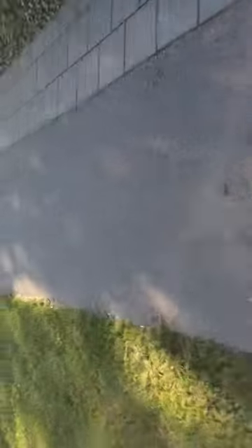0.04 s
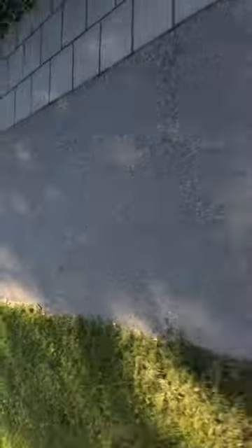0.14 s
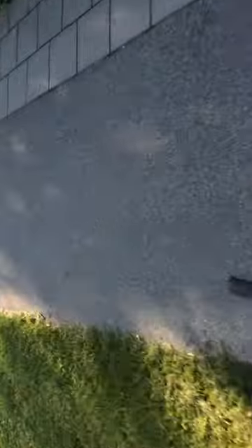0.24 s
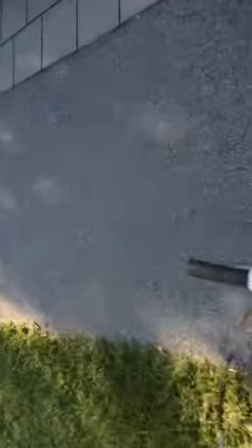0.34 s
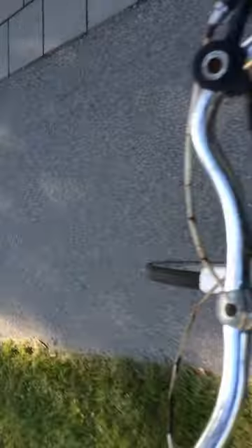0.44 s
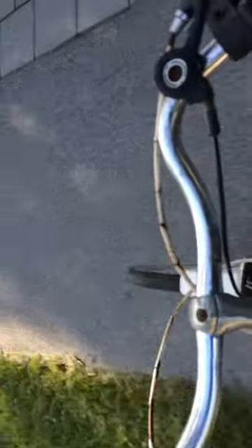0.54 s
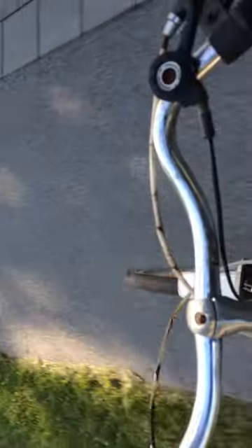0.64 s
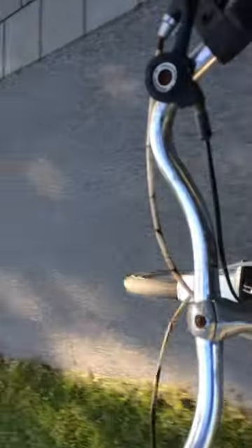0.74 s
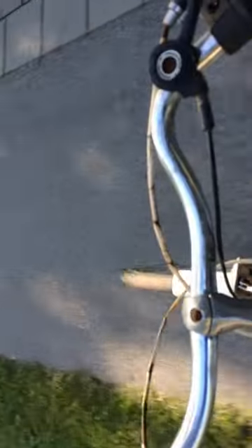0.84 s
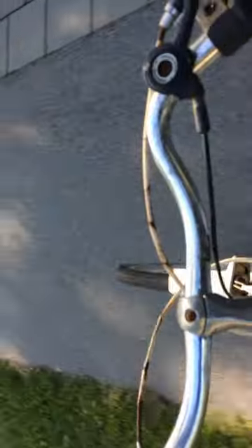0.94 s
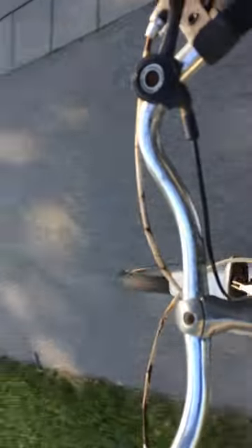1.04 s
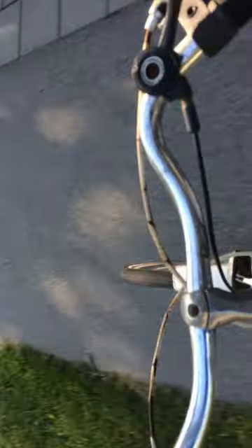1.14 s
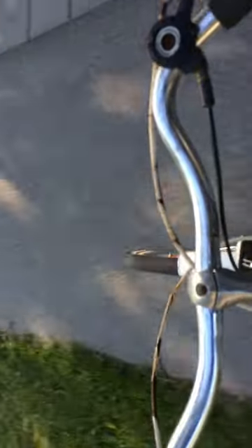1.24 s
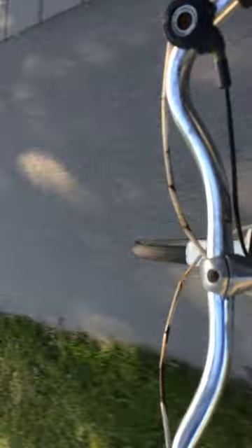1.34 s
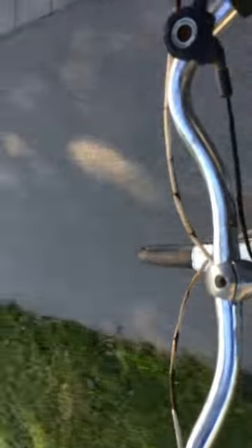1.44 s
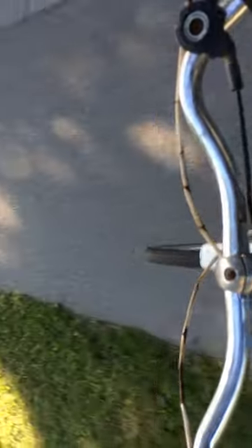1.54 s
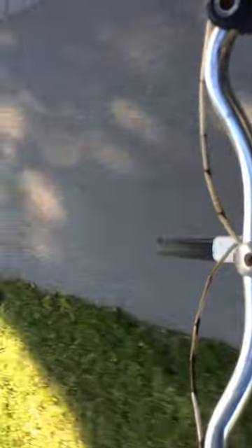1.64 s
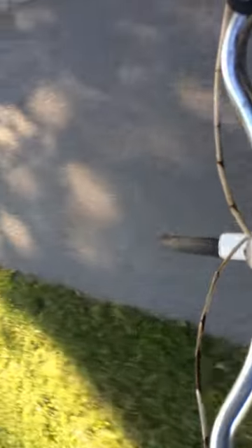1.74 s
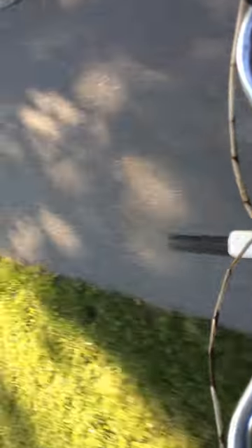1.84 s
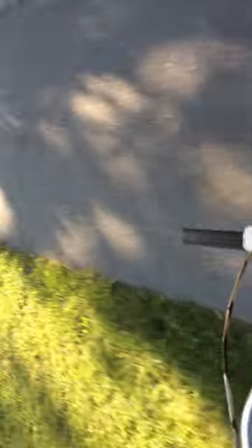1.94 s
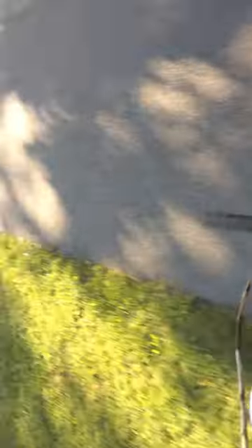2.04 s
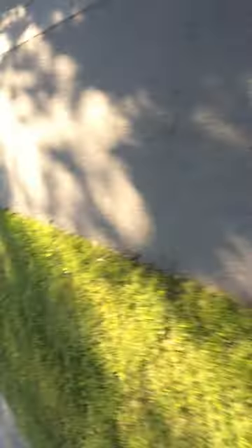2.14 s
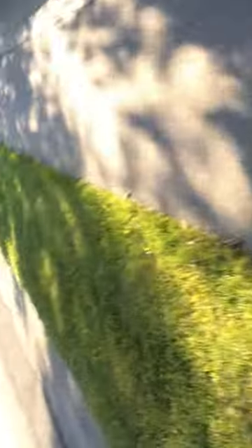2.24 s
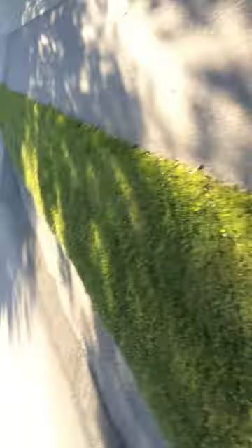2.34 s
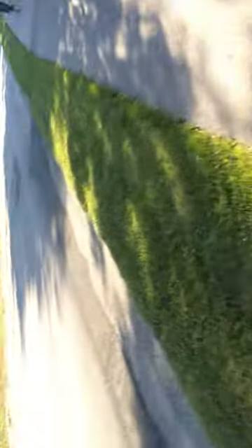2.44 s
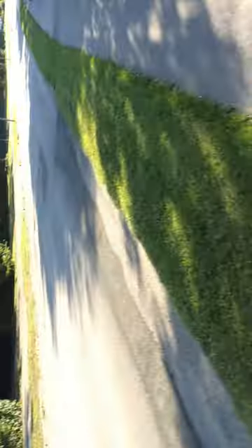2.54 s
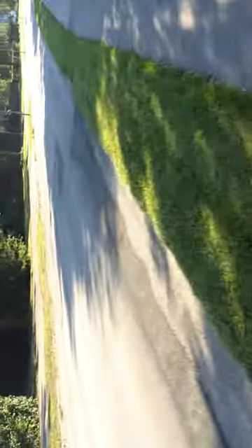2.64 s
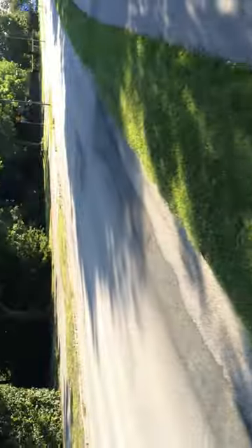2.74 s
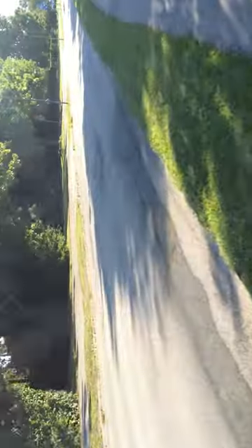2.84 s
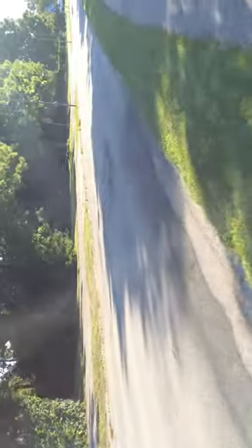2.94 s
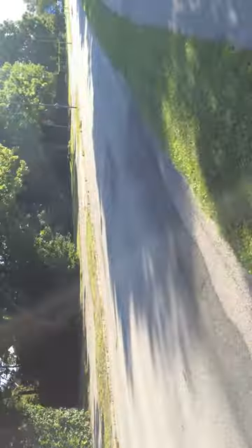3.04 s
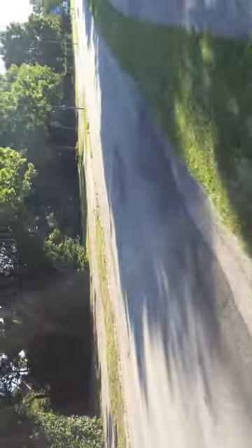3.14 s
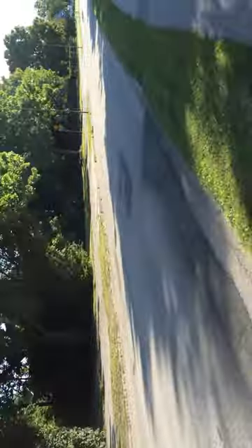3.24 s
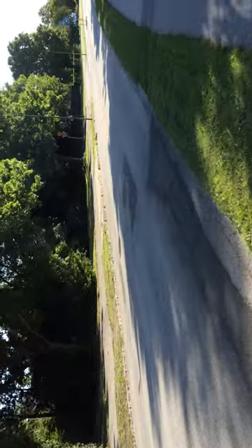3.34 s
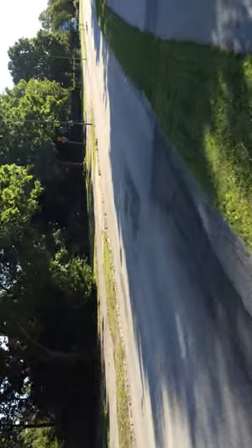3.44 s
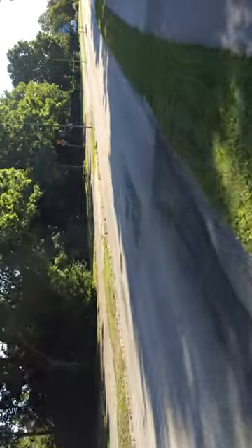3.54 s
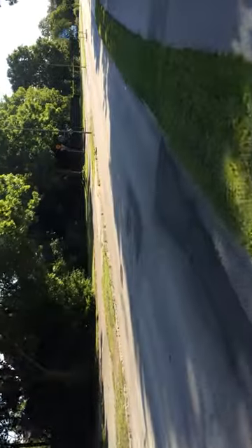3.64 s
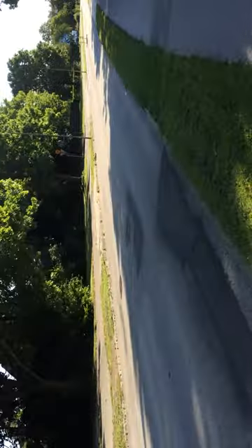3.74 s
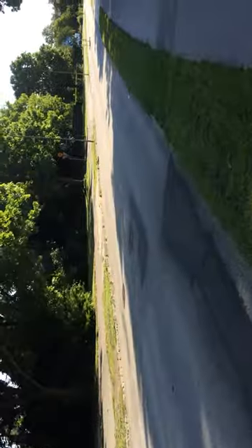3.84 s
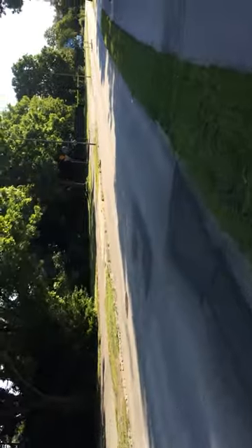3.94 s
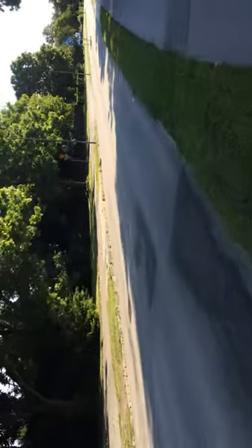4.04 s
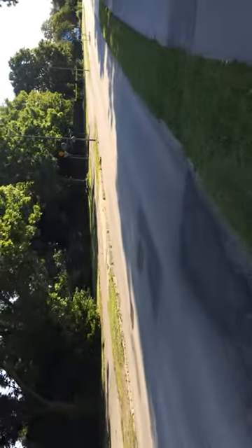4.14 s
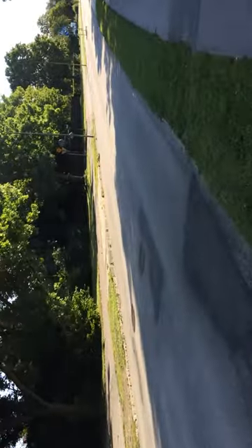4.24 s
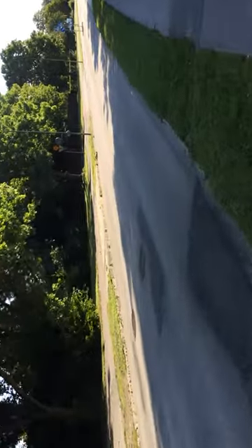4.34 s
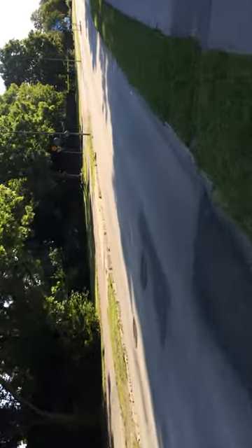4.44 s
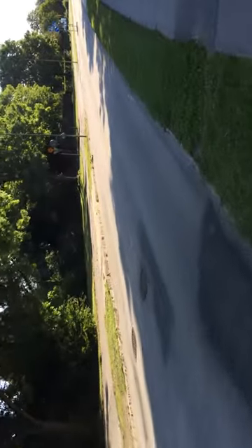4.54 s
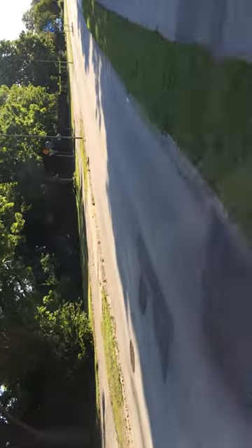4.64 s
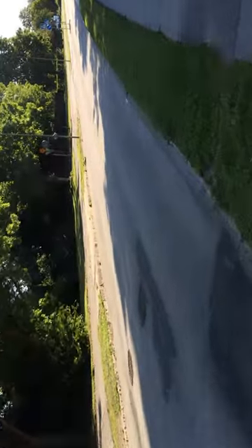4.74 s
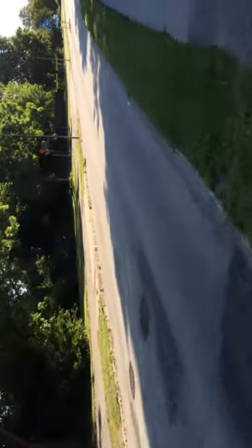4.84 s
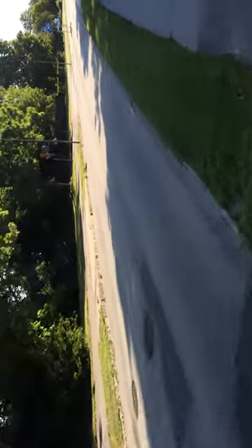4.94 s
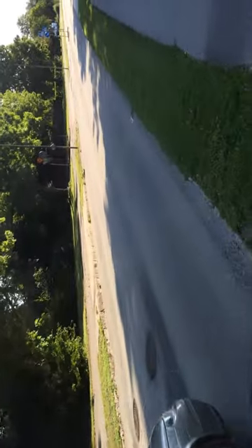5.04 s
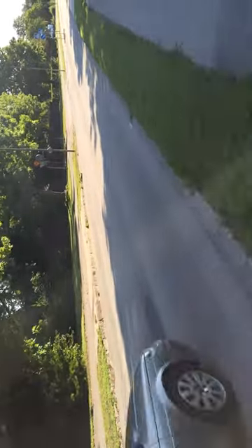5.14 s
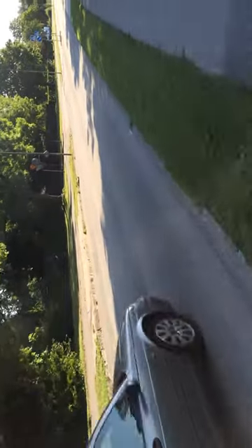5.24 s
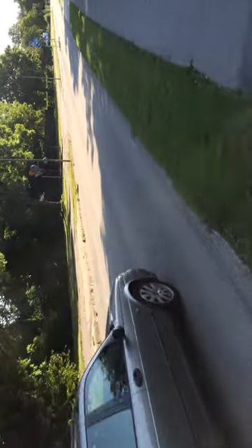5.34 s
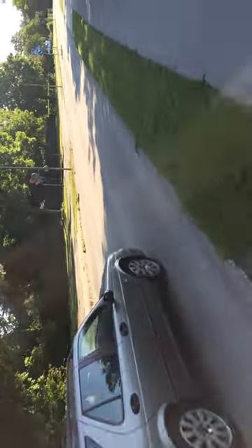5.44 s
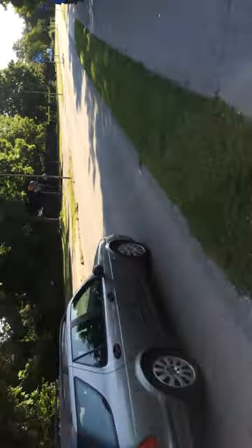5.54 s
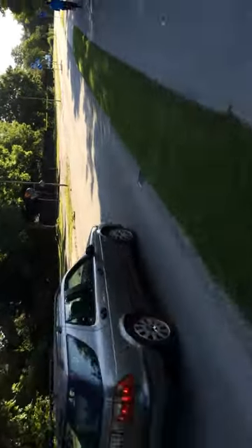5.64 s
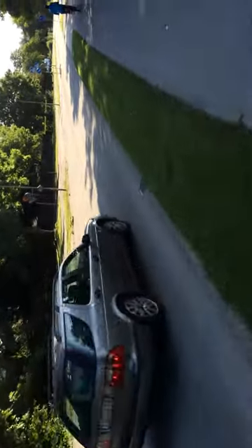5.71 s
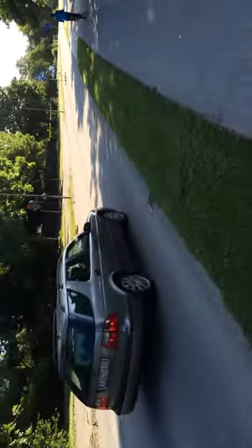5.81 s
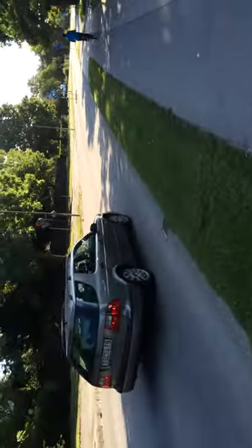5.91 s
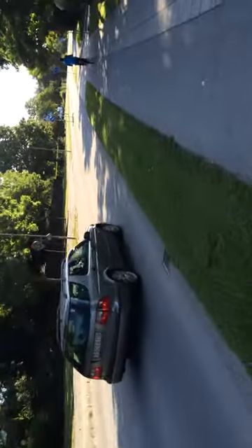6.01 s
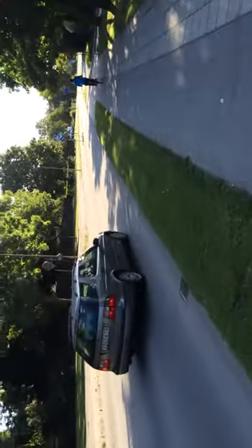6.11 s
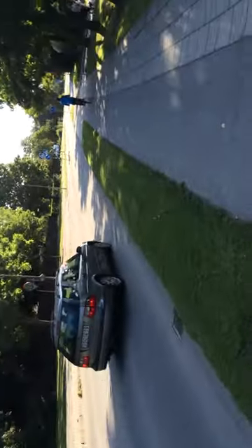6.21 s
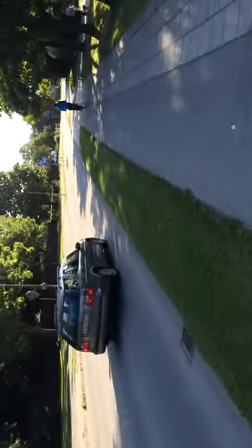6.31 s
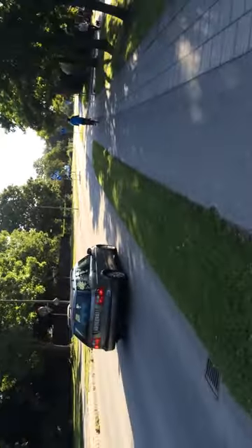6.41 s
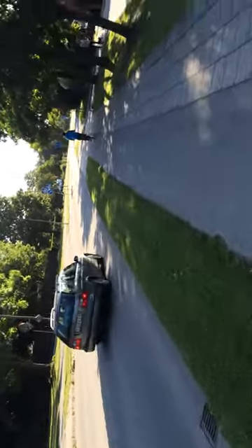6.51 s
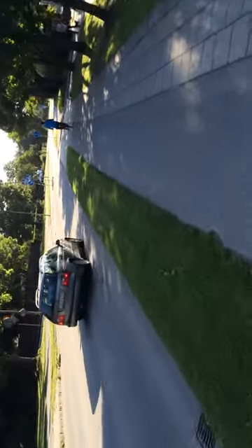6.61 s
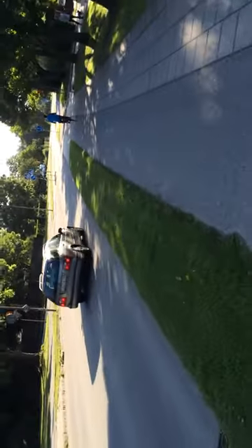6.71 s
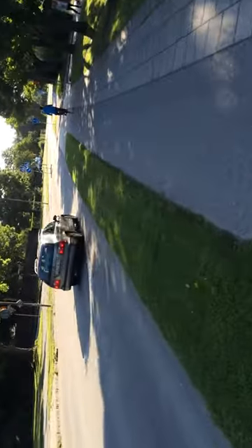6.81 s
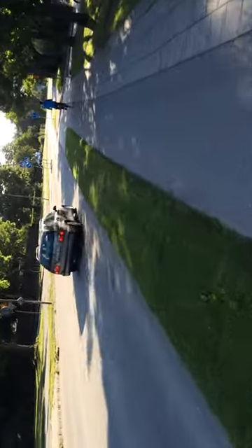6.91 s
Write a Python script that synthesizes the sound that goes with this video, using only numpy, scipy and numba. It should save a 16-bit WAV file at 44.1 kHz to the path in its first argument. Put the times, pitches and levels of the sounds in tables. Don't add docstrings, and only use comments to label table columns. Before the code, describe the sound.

Quiet bicycle tyre hum and fine metallic chain rustle, one sharp snap, then a car swells past with hissing tyres and a bright rattle.

```python
import sys
import numpy as np
from scipy import signal
from scipy.fft import rfft, irfft, next_fast_len
from scipy.io import wavfile
from scipy.ndimage import uniform_filter1d
from numba import njit

SR = 44100
rng = np.random.default_rng(int(sys.argv[2]) if len(sys.argv) > 2 else 0)


def gain_from_db(level_db):
    decades = np.asarray(level_db, float) / 20
    return 10 ** decades


def bounce(signal):
    frames = np.transpose(np.atleast_2d(signal))
    limited = np.clip(frames, -1, 1)
    pcm = np.round(limited * 32767).astype(np.int16)
    wavfile.write(sys.argv[1], SR, pcm)


N = 307377

# t/s, f/Hz, level/dB
FIRING = [(1.6, 73.5, -48.5), (2.4, 70.46, -52.5), (3.3, 73.18, -46), (3.9, 73.8, -49), (4.3, 75.83, -48),
          (4.7, 62, -38), (5.2, 58.77, -48), (5.5, 57.44, -38), (5.78, 56.8, -37.5), (5.95, 56.63, -43),
          (6.3, 56.6, -57), (6.97, 57, -52)]
# f/Hz, width/Hz, level/dB
EXHAUST_MODES = [(62, 31, 2), (151, 21, 11), (168, 16.6, 10.5), (277, 13, 1.5)]
# f/Hz, density/dB
RUMBLE_SPECTRUM = [(60, -20), (100, -6.5), (165, 0), (250, -1.5), (340, -11.5), (500, -34)]
ROAR_SPECTRUM = [(230, -22), (360, -1), (480, 3.5), (620, 2.5), (800, -8.5), (1200, -20)]
HISS_SPECTRUM = [(900, -53), (1400, 4.5), (1900, 2.5), (2300, 0.5), (2900, -4.5), (4500, -12), (7000, -19),
                 (12000, -37.5)]
SPRAY_SPECTRUM = [(3000, 5), (6000, -3), (8500, -3), (11000, -8), (14500, -11.5), (16000, -14)]
# front level/dB, rear level/dB, loss per distance doubling/dB
RUMBLE_PASS = (-36, -42, 6.74)
ROAR_PASS = (-39, -39.5, 11.1)
RING_PASS = (-38.5, -33.5, 5.3)
SECOND_PASS = (-40.5, -45.5, 6.2)
HISS_PASS = (-43, -40, 3.9)
SPRAY_PASS = (-46.5, -50.5, 10)
# t/s, level/dB, f/Hz, length/s
TREAD_SONG = [(4.37, -35, 926, 0.055), (4.442, -35, 690, 0.038), (4.487, -44, 660, .015),
              (4.545, -35, 950, .03), (4.62, -37, 910, 0.039), (4.668, -31, 930, .035),
              (4.75, -43, 900, 0.027), (4.808, -35, 930, 0.026), (4.938, -35, 815, 0.053),
              (5.001, -33, 780, 0.036), (5.03, -41, 574, .05), (5.122, -43, 990, 0.052),
              (5.196, -36, 600, 0.048), (5.27, -37, 940, .06), (5.376, -40, 940, 0.043),
              (5.52, -32.5, 1000, .08), (5.778, -36, 1070, 0.14), (5.916, -34, 986, 0.057),
              (6.081, -41, 980, 0.075), (6.17, -44, 1027, .06), (6.249, -44, 1220, .06),
              (5.7, -41, 1200, .05), (5.901, -34, 1320, 0.043), (5.277, -42, 1150, 0.036)]
# t/s, peak level/dB
STONE_HITS = [(5.0609, -44), (5.672, -47), (6.0194, -50), (6.0767, -45), (6.343, -49), (6.3999, -43),
              (6.5051, -52), (6.561, -41), (6.6228, -46), (6.7226, -44), (6.777, -56), (6.8853, -57),
              (6.905, -61), (6.9247, -57)]
# t/s, peak level/dB, upper ring level/dB, burst length/s, upper ring f/Hz
RATTLE_JOLTS = [(5.516, -30, -14, 0.02, 6450), (5.535, -32, 1, 0.006, 6500),
                (5.5413, -31.5, 2.5, 0.008, 6370), (5.552, -30, -4, 0.006, 6500),
                (5.559, -27.5, -3, 0.006, 6465), (5.566, -33, -6, .006, 6480),
                (5.692, -31.5, -3, 0.014, 6400), (5.7385, -24, -10, 0.0065, 6420),
                (5.7465, -27, -6, .005, 6450), (5.7677, -23.5, -3.5, 0.0078, 6400),
                (5.7724, -30, -6, 0.0076, 6480), (5.817, -33, -4, 0.014, 6300),
                (5.845, -27.5, -2, 0.0091, 6400), (5.852, -31.5, 1, .007, 6320),
                (5.863, -39, -7, .008, 6420), (5.891, -28, -2, 0.0073, 6400),
                (5.8946, -28, -8, 0.0066, 6250), (5.903, -28, -12, 0.009, 6300),
                (5.9213, -28, -1.5, 0.0091, 6260), (5.931, -34, -11, .008, 6250),
                (5.97, -31.5, -5, 0.015, 6350), (5.995, -33.5, -8, 0.026, 6400)]
# f/Hz, width/Hz, level/dB
RATTLE_LOW_MODES = [(2300, 970, -1), (3300, 300, 0.5), (3630, 440, -9), (4300, 830, -3), (5700, 1300, -4.5)]
RATTLE_HIGH_MODES = [(5700, 900, -1.5), (7300, 1500, -7), (8750, 3900, -8), (12300, 6700, -7)]
# f/Hz, level/dB, t60/s
FRAME_MODES = [(913, -8, 0.23), (1145, -5, 0.14), (1450, -18, .39), (1857, -10, 0.23), (2353, -8, 0.35),
               (2600, -3.5, 0.27), (3040, -12, 0.34), (4000, -19, 0.15), (4670, -12, 0.14),
               (5970, -4, 0.084), (6891, -11, 0.065), (8366, -20, 0.15)]
# delay/s, level/dB, side ring level/dB
BOUNCES = [
    (0.001, 2, 1.5),
    (.0065, -11, -4),
    (0.0146, -13, -16),
    (.025, -5, -15),
]
# f/Hz, level/dB, t60/s
PART_MODES = [(1850, -2, 0.029), (2350, -3, 0.036), (2640, -4, 0.069)]
PART_SIDE_MODES = [(1150, 0, 0.042), (2800, -1, .04), (2260, -2, .04), (3670, -6, 0.056), (4250, -7, .035),
                   (600, -14, 0.059), (4750, -12, .06)]
# f/Hz, width/Hz, level/dB
KNOCK_MODES = [(616, 76, -1), (1340, 1400, 1), (2380, 890, 8.5), (4200, 1500, 3), (6500, 880, 1)]
# t/s, peak level/dB, f/Hz
DRY_TICKS = [(.2045, -50, 8000), (0.2154, -36.5, 2400), (.2225, -35, 2300), (0.2427, -38, 9400),
             (.9518, -36, 14200), (1.329, -41, 5000), (1.5824, -45, 9000), (1.8847, -37, 6500),
             (1.9517, -33, 3000), (1.9584, -11, 3070), (2.1312, -49, 7000), (3.1796, -34.5, 3500)]
# f/Hz, width/Hz, level/dB
TICK_TAIL_MODES = [(2930, 1500, 3.5), (3720, 790, -2), (8950, 12000, 3)]
# f/Hz, level/dB, t60/s
GRIP_MODES = [(2050, 4, .008), (3500, 6, .011), (5300, -3, .006), (1250, 0, .008), (2750, 2, .008)]
# t/s, peak level/dB, f/Hz
SEAM_BUMPS = [
    (.69, -25.5, 76.6),
    (2.228, -33, 109),
]
# t/s, level/dB, f/Hz, length/s, width/Hz
SQUEAK_EVENTS = [(.083, -42, 2620, 0.013, 150), (.094, -37, 2640, 0.013, 170), (.094, -46, 2380, .01, 170),
                 (.075, -43, 600, 0.0096, 170), (.254, -52, 2600, 0.014, 200),
                 (5.737, -39, 3600, .008, 500), (5.891, -41, 3380, 0.018, 300),
                 (5.922, -41, 3300, 0.021, 300), (.58, -66, 4100, .11, 60), (.6, -66, 5000, .12, 60),
                 (.55, -66, 11200, .12, 80), (.72, -63, 6300, .03, 150), (.92, -60, 5600, .02, 150),
                 (1.75, -73, 8560, .08, 60), (1.845, -63, 6550, .11, 90), (5.535, -42, 9400, 0.016, 200),
                 (5.56, -50, 7800, .01, 250), (5.768, -47, 7800, 0.011, 250),
                 (5.846, -53, 11700, .012, 250), (5.893, -48, 8700, .006, 400),
                 (5.92, -50, 9400, .022, 200), (5.97, -50, 9600, .015, 300)]
# f/Hz, density/dB
ROLL_SPECTRUM = [(59, -23), (100, -7.5), (118, -10), (143, -1), (314, -7.5), (383, -13.5), (615, -16.5),
                 (761, -15.5), (942, -9.5), (1200, -19.5), (1540, -14.5), (3490, -28), (5000, -28.5),
                 (6500, -34), (11000, -120)]
# t/s, level/dB
SURFACE_LEVEL = [
    (0.0, -49.5),
    (0.96, -47),
    (1.4, -47.5),
    (2.0, -47),
    (2.6, -48.5),
    (3.3, -46.5),
    (4.2, -49),
]
# f/Hz, density/dB
RUSTLE_SPECTRA = [
    [(2500, -5), (4000, -8), (5500, -8), (7000, -2.5), (9000, -8.5)],
    [(6500, -10), (8500, 0.5), (10500, 0.5), (12500, -3)],
    [(9500, -16), (11500, -4), (14000, 1), (16000, -10)],
]
RUSTLE_LEVELS_DB = [-6, -9.5, -13]
# t/s, peak level/dB, fade/s
RUSTLE_PATCHES = [(.26, -47.5, 0.035), (.17, -63, .04), (.37, -58, .06), (.6, -58, 0.33), (.665, -56, .02),
                  (.78, -53.5, 0.04), (.835, -55, .015), (.93, -54, .012), (.965, -54, .025),
                  (1.07, -60, .08), (1.19, -54.5, 0.054), (1.335, -50, 0.04), (1.38, -55, 0.03),
                  (1.55, -57.5, 0.17), (1.79, -48.5, 0.015), (1.884, -56, 0.037), (1.99, -53.5, 0.11),
                  (2.14, -58, .035), (2.21, -57, 0.027), (2.31, -55, 0.042), (2.41, -57, .06),
                  (2.585, -61, 0.035), (3.23, -55, 0.018), (3.4, -66, 0.061), (2.98, -60, 0.054),
                  (3.54, -55.5, 0.058), (3.75, -65, 0.13), (4.1, -61, 0.23)]
# t/s, peak level/dB, f/Hz
LINK_RINGS = [(0.237, -57, 9474), (0.239, -60, 13350), (0.242, -63, 14987), (0.252, -56, 7838),
              (0.255, -58, 8699), (0.258, -64, 14211), (0.377, -60, 9733), (0.391, -63, 12489),
              (0.454, -58, 10680), (0.464, -72, 14987), (0.475, -65, 13781), (0.655, -62, 8441),
              (0.728, -57, 6373), (0.832, -64, 11455), (0.947, -58, 14814), (0.956, -64, 12403),
              (1.165, -60.5, 7407), (1.189, -63, 11627), (1.329, -56, 5167), (1.352, -61, 9216),
              (1.474, -59, 10077), (1.58, -59, 9216), (1.66, -62, 8613), (1.719, -55, 13695),
              (1.776, -68, 8527), (1.857, -62, 13867), (1.88, -64, 12661), (1.88, -57, 8613),
              (1.88, -56, 6718), (1.882, -58, 5512), (2.153, -57, 8354), (2.256, -64, 10249),
              (2.285, -66, 13695), (2.3, -57, 8699), (2.336, -63, 9646), (2.401, -66, 11800),
              (2.401, -63, 13781), (2.424, -56, 8354), (2.607, -59, 11541), (2.712, -69, 12575),
              (2.76, -63, 10077), (3.401, -88, 14039), (3.536, -69.5, 7149), (3.707, -84, 14556),
              (3.765, -69, 13608), (3.91, -70, 14298)]
# f/Hz, density/dB
WIND_SPECTRUM = [(15, -45), (28, -22), (45, -6), (62, 3.5), (90, -6.5), (130, -2.5), (200, -52)]
# t/s, peak level/dB, fade/s
WIND_GUSTS = [(.05, -47.5, 0.077), (.35, -54, 0.048), (.68, -44, 0.12), (1.18, -48, 0.14),
              (1.47, -51, 0.058), (1.61, -50, 0.092), (1.94, -52, .1), (2.27, -45.5, 0.29),
              (2.68, -46.5, 0.12), (2.92, -44.5, 0.16), (3.25, -46, 0.087), (3.5, -44, 0.047),
              (3.67, -39.5, 0.13), (4.2, -48, 0.31), (4.68, -39.5, 0.048), (4.92, -36, 0.042),
              (5.05, -41.5, 0.11), (5.28, -38, 0.068), (5.43, -38, 0.13), (5.63, -38, 0.059),
              (6.08, -46, .06), (6.22, -49.5, 0.14), (6.5, -49.5, 0.18), (6.86, -47.5, 0.11)]

FRONT_S, REAR_S = 4.87, 5.595
LANE_M, CLOSING_M_S, LEAVING_M_S = 3.05, 6.63, 6
BEHIND_MS, AHEAD_MS, TURN_S, TURN_LENGTH_S = 1.15, 0.94, 5.3, 0.52
STRETCH_MS, STRETCH_S, STRETCH_LENGTH_S = 0.53, 5.03, 0.051
SCREEN_S, SCREEN_LENGTH_S, BEND_S = 4.664, 0.13, 0.58
SCREEN_TREAD_DB, SCREEN_HISS_DB, SCREEN_SPRAY_DB = -1.5, -2.5, -12
HISS_ARRIVES_S, HISS_RISE_S, HISS_FAR_DB = 3.52, 0.25, -19
LUMP_DB, LUMP_RATE_HZ = 1.5, 40
SONG_WIDTH_HZ = 140
STONE_HZ, STONE_WIDTH_HZ = 13500, 3500
UPPER_RING_DB, UPPER_RING_WIDTH_HZ, SHIVER_DB = 5.5, 130, -18.5
CLINK_S, CLINK_DB, PART_DB = 0.0718, -36, -34.5
ROLL_DB, CHAIN_DB, BREEZE_DB = -47.5, -59, -61
PHONE_TOP_HZ = 15330


def car():
    t = np.arange(N) / SR
    center_hz = road_mirror_hz(t)
    tread = passing(*RING_PASS) * gain_from_db(0.5 * walk(20)) * ridge(center_hz, 443.0)
    tread += passing(*SECOND_PASS) * gain_from_db(0.11 * walk(16)) * ridge(1.67 * center_hz, 430.0)
    body = passing(*RUMBLE_PASS) * noise(RUMBLE_SPECTRUM, 0.21, 9.1)
    body += passing(*ROAR_PASS) * noise(ROAR_SPECTRUM, 0.96, 8)
    hidden = 1 - step_up(t, SCREEN_S, SCREEN_LENGTH_S)
    bent = 1 - step_up(t, SCREEN_S - BEND_S, SCREEN_LENGTH_S)
    far_db = HISS_FAR_DB * (1 - step_up(t, HISS_ARRIVES_S, HISS_RISE_S))
    hiss_db = SCREEN_HISS_DB * (bent + 1.3 * hidden) + far_db
    hiss = passing(*HISS_PASS) * gain_from_db(hiss_db) * noise(HISS_SPECTRUM, 0.28, 7.4)
    spray = passing(*SPRAY_PASS) * gain_from_db(SCREEN_SPRAY_DB * hidden) * noise(SPRAY_SPECTRUM, 0.59, 21.96)
    near = body + gain_from_db(SCREEN_TREAD_DB * bent) * tread + hiss
    earshot = np.clip((t - 1.3) / 2.76, 0, 1)
    return near * earshot + spray + engine()


def road_mirror_hz(t):
    ahead = step_up(t, TURN_S, TURN_LENGTH_S)
    skew = np.where(t < STRETCH_S, 1.8, 0.7)
    stretch = np.exp(-((t - STRETCH_S) / skew / STRETCH_LENGTH_S) ** 2)
    delay_ms = BEHIND_MS + (AHEAD_MS - BEHIND_MS) * ahead + STRETCH_MS * stretch
    return 1000 / delay_ms


def passing(front_db, rear_db, loss_db):
    power = 0
    for s, db in (FRONT_S, front_db), (REAR_S, rear_db):
        t = np.arange(N) / SR - s
        metres = np.hypot(LANE_M, t * np.where(t < 0, CLOSING_M_S, LEAVING_M_S))
        power = power + gain_from_db(db - loss_db * np.log2(metres / LANE_M)) ** 2
    return np.sqrt(power)


def engine():
    hz, db = curve(FIRING)
    cycles = np.cumsum(hz * (1 + 0.02 * walk(30))) / SR
    fires = np.diff(np.floor(cycles), prepend=0)
    pulses = fires * gain_from_db(3.5 * rng.standard_normal(N))
    fade_in = np.clip((np.arange(N) / SR - 1.2) / 0.84, 0, 1)
    return unit(resonate(pulses - hz / SR, EXHAUST_MODES)) * gain_from_db(db) * fade_in


def tread_song():
    return rubs([tuple(row) + (SONG_WIDTH_HZ,) for row in TREAD_SONG])


def stones():
    out, t = np.zeros(N), np.arange(SR // 200) / SR
    click = np.cos(2 * np.pi * STONE_HZ * t) * np.exp(-np.pi * STONE_WIDTH_HZ * t)
    for s, db in STONE_HITS:
        add(out, gain_from_db(db + 8) * click, s + 0.001)
    return signal.sosfilt(signal.butter(2, 9500, "high", fs=SR, output="sos"), out)


def rattle():
    out, t = np.zeros(N), np.arange(SR // 8) / SR
    for s, db, high_db, length_s, hz in RATTLE_JOLTS:
        chatter = 0.12 + 0.88 / (1 + (t / length_s) ** 4)
        shape = np.minimum(t / 0.0012, 1) * np.exp(-t / 0.02) * chatter
        shape = gain_from_db(db - 10.5) * (shape + gain_from_db(SHIVER_DB) * np.exp(-t / 0.055))
        grit = rng.standard_normal(len(t)) * gain_from_db(2.8 * rng.standard_normal(len(t)))
        low = dull(resonate(shape * grit, RATTLE_LOW_MODES), 9300)
        high = gain_from_db(high_db) * resonate(shape * grit, RATTLE_HIGH_MODES)
        add(out, low + high, s - 0.001)
        upper = even(resonate(grit, [(hz, UPPER_RING_WIDTH_HZ, 0)]), 0.008)
        ring_shape = signal.lfilter([0.008], [1, -0.992], shape)
        add(out, gain_from_db(high_db + UPPER_RING_DB) * upper * ring_shape, s - 0.001)
    return out


def clink():
    out, t = np.zeros(N), np.arange(SR // 10) / SR
    add(out, gain_from_db(CLINK_DB) * ring(FRAME_MODES), CLINK_S)
    for later_s, db, side_db in BOUNCES:
        knock = rng.standard_normal(len(t)) * np.minimum(t / 0.001, 1) * np.exp(-t / 0.007)
        add(out, gain_from_db(side_db / 2 - 43.0) * dull(resonate(knock, KNOCK_MODES), 9300), CLINK_S + later_s)
        rings = gain_from_db(db) * ring(PART_MODES) + gain_from_db(side_db) * ring(PART_SIDE_MODES)
        add(out, gain_from_db(PART_DB) * rings, CLINK_S + later_s)
    return out


def ticks():
    out, t = np.zeros(N), np.arange(SR // 10) / SR
    for s, db, hz in DRY_TICKS:
        tail = gain_from_db(-34) * resonate(rng.standard_normal(len(t)) * np.exp(-(t / 0.02) ** 2), TICK_TAIL_MODES)
        edge = 0.45 * (db > -36) * (t == 0)
        snap = edge + np.cos(2 * np.pi * hz * t) * np.exp(-((t - 0.0001) / 0.00026) ** 2)
        add(out, gain_from_db(db) * (snap + tail), s)
        if db > -20:
            add(out, gain_from_db(db - 20.0) * ring(GRIP_MODES), s)
    return out


def bumps():
    out, t = np.zeros(N), np.arange(SR // 10) / SR
    for s, db, hz in SEAM_BUMPS:
        add(out, gain_from_db(db) * np.sin(2 * np.pi * hz * t) * (t / 0.018) * np.exp(1 - t / 0.0088), s)
    return out


def rubs(rows):
    out, t = np.zeros(N), np.arange(SR // 5) / SR
    for s, db, hz, length_s, width_hz in rows:
        tone = resonate(rng.standard_normal(2 * len(t)), [(hz, width_hz, 0)])
        tone = even(tone, 2.5 / width_hz)[len(t):]
        burst = gain_from_db(db) * tone * np.minimum(t / (0.3 * length_s), 1) / (1 + (t / length_s) ** 5)
        add(out, svf(burst, np.full(len(t), 1. * hz), 2.5 * width_hz), s)
    return out


def tyre_hum():
    surface_db = curve(SURFACE_LEVEL)[0]
    return gain_from_db(surface_db - surface_db[:SR].mean() + ROLL_DB) * noise(ROLL_SPECTRUM, 0.53, 9.6)


def chain():
    rustle = sum(gain_from_db(db) * noise(band, 1.3, 35) for band, db in zip(RUSTLE_SPECTRA, RUSTLE_LEVELS_DB))
    return rustle * swells(RUSTLE_PATCHES, CHAIN_DB) * gain_from_db(0.74 * walk(60) + 1.3 * walk(400))


def link_rings(count):
    out, t = np.zeros(N), np.arange(SR // 25) / SR
    draws = rng.random((count, 3))
    faint = [(2.7 * when, -65 - 6 * size, 4500 + 5000 * pitch) for when, pitch, size in draws]
    for s, db, hz in faint + list(LINK_RINGS):
        add(out, gain_from_db(db) * np.sin(2 * np.pi * hz * t) * (t / 0.004) * np.exp(1 - t / 0.004), s)
    return out


def wind():
    return swells(WIND_GUSTS, BREEZE_DB) * even(noise(WIND_SPECTRUM, 1.5, 16), 0.072)


def curve(table):
    s, *columns = np.transpose(table)
    return [np.interp(np.arange(N) / SR, s, c) for c in columns]


def step_up(t, center_s, length_s):
    return 0.5 + 0.5 * np.tanh((t - center_s) / length_s)


def unit(x):
    return x / np.sqrt(np.mean(x ** 2))


def even(x, seconds):
    return x / np.sqrt(uniform_filter1d(x ** 2, int(seconds * SR)) + 1e-12)


def walk(rate_hz):
    k = int(SR / rate_hz)
    held = np.repeat(rng.standard_normal(N // k + 1), k)
    return unit(uniform_filter1d(uniform_filter1d(held, k), k)[:N])


def noise(spectrum, flicker_db, rate_hz):
    size = next_fast_len(N)
    hz, db = np.transpose(spectrum)
    bin_hz = np.arange(1, size // 2 + 2) * SR / size
    gain = gain_from_db(np.interp(np.log(bin_hz), np.log(hz), db, -90, -90))
    colored = irfft(rfft(rng.standard_normal(size)) * gain, size)[:N]
    return unit(colored) * gain_from_db(flicker_db * walk(rate_hz))


@njit
def svf(x, hz, width):
    y, b, l = np.empty(len(x)), 0., 0.
    for i in range(len(x)):
        g, k = np.tan(np.pi * hz[i] / SR), width / hz[i]
        v = (b + g * (x[i] - l)) / (1 + g * (g + k))
        b, l, y[i] = 2 * v - b, l + 2 * g * v, k * v
    return y


def resonate(x, peaks):
    out = 0
    for hz, width_hz, db in peaks:
        band = svf(x, np.full(len(x), 1. * hz), 1. * width_hz)
        out = out + gain_from_db(db) * band * np.sqrt(SR / width_hz / np.pi)
    return out


def ridge(hz, width_hz):
    strands = 0
    for k in (-1, 0, 1):
        level = gain_from_db(LUMP_DB * walk(LUMP_RATE_HZ))
        source = rng.standard_normal(N)
        strand_hz = hz + width_hz * (k / 2.5 + 0.06 * walk(9))
        strands = strands + level * svf(source, strand_hz, width_hz / 2)
    return unit(svf(strands, hz, 2 * width_hz))


def ring(modes):
    t = np.arange(SR // 4) / SR
    out = 0
    for k, (hz, db, t60) in enumerate(modes):
        out = out + (-1) ** k * gain_from_db(db) * np.sin(2 * np.pi * hz * t) * 1000. ** (-t / t60)
    return out


def dull(x, hz):
    return signal.sosfilt(signal.butter(2, hz, fs=SR, output="sos"), x)


def swells(rows, steady_db):
    t = np.arange(N) / SR
    power = sum(gain_from_db(db) ** 2 * np.exp(-2 * np.abs(t - s) / fade_s) for s, db, fade_s in rows)
    return np.sqrt(gain_from_db(steady_db) ** 2 + power)


def add(out, x, s):
    i = int(s * SR)
    out[i:i + len(x)] += x[:N - i]


def scene():
    passing_car = car() + tread_song() + stones()
    loose_parts = rattle() + clink() + ticks() + bumps() + rubs(SQUEAK_EVENTS)
    bicycle = tyre_hum() + chain() + link_rings(count=260) + wind()
    return (passing_car + loose_parts + bicycle)[None]


def band_limit(x):
    return signal.sosfilt(signal.butter(12, 16510, fs=SR, output="sos"), x)


def record(dry):
    top_cut = signal.ellip(10, 0.2, 45, PHONE_TOP_HZ, fs=SR, output="sos")
    mix = signal.sosfilt(top_cut, dry)
    return band_limit(mix)


dry = scene()
out = record(dry)
bounce(out)
```